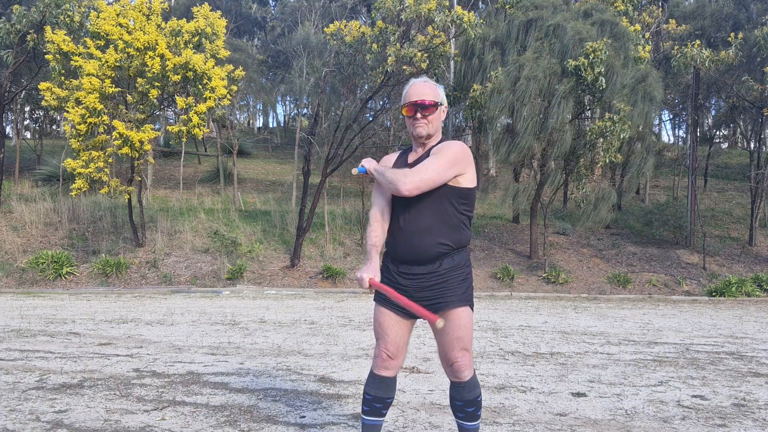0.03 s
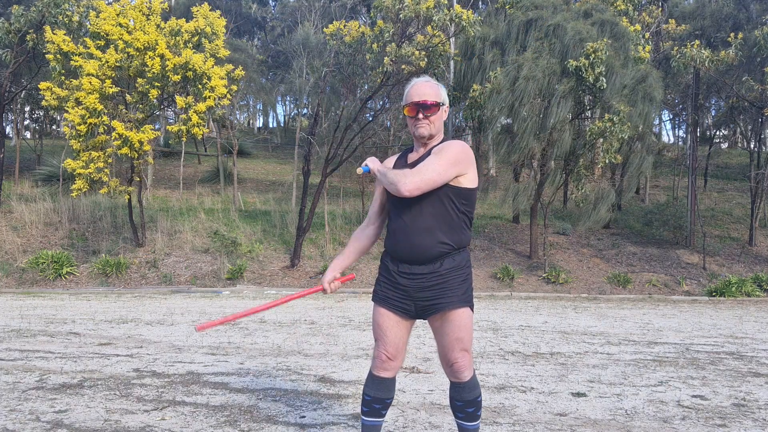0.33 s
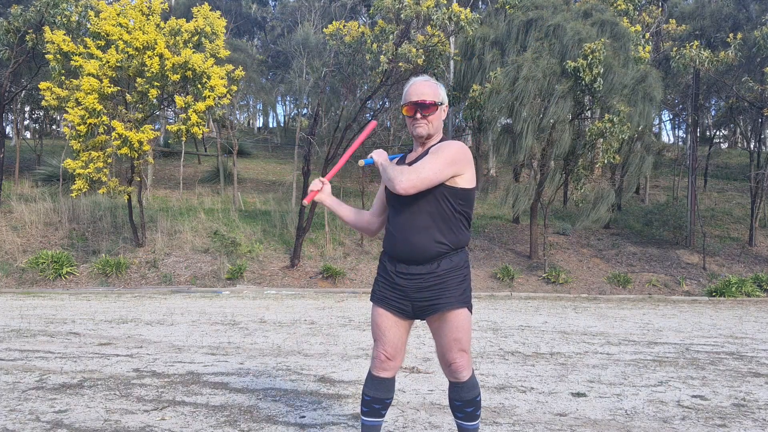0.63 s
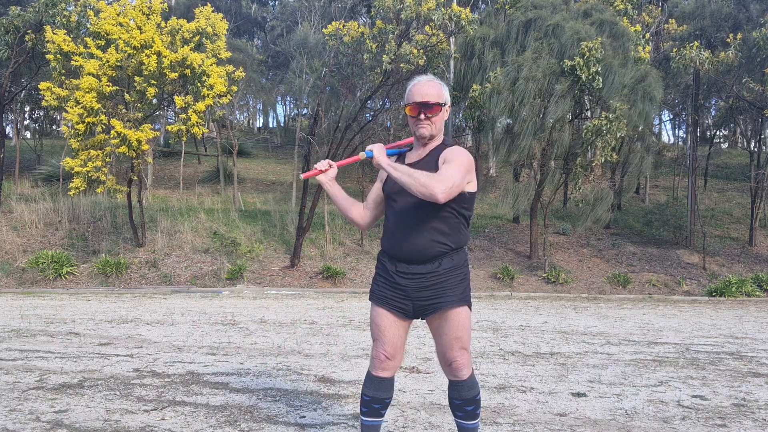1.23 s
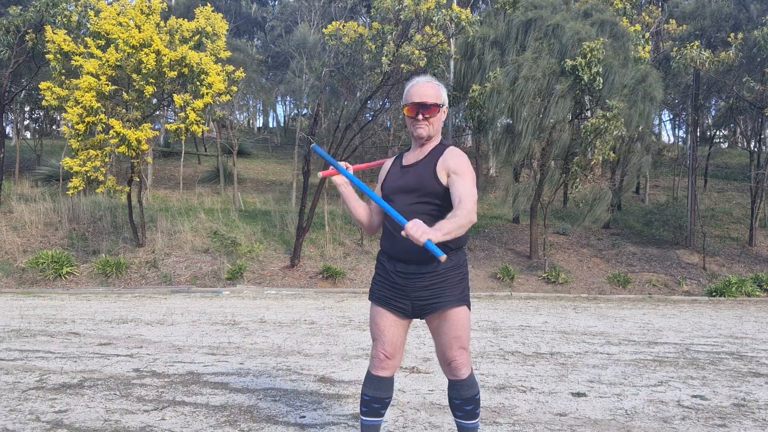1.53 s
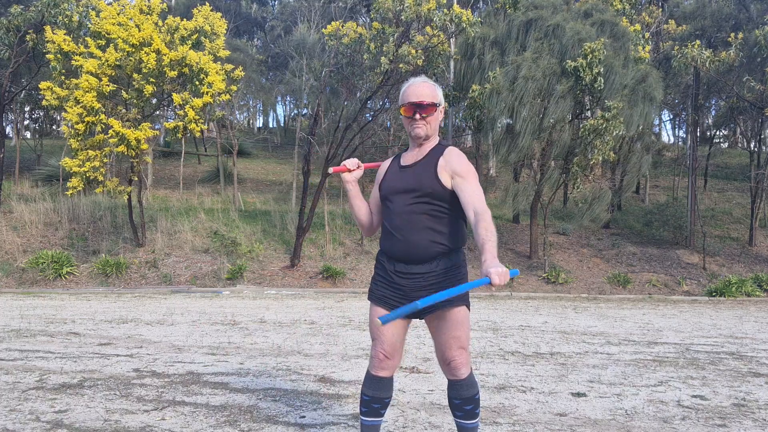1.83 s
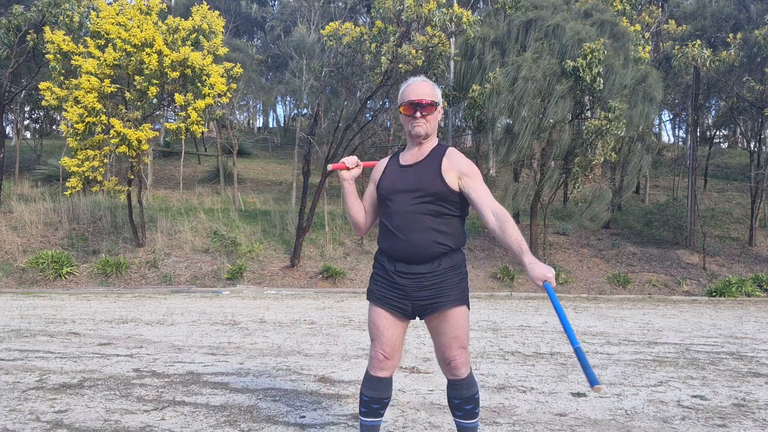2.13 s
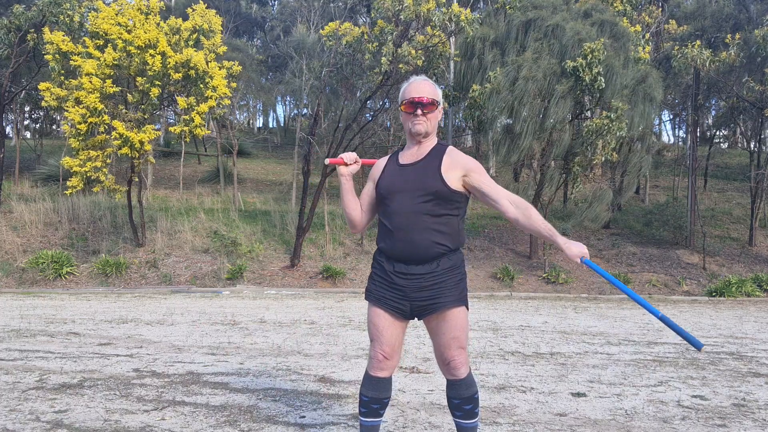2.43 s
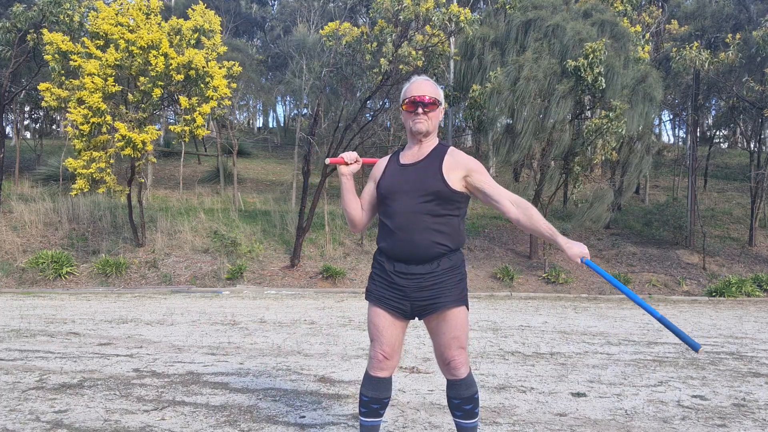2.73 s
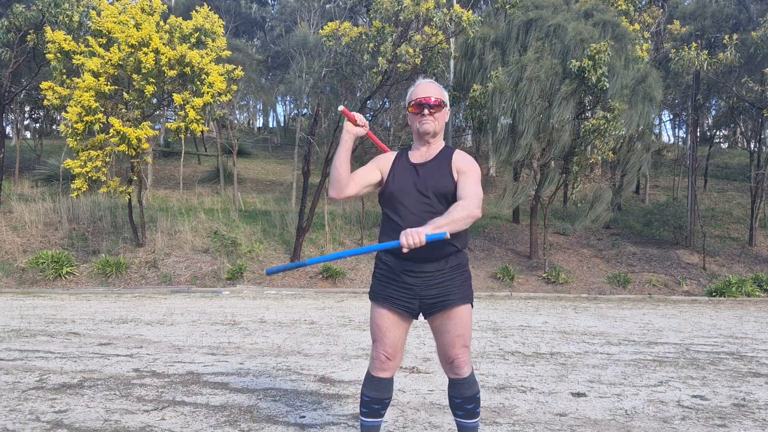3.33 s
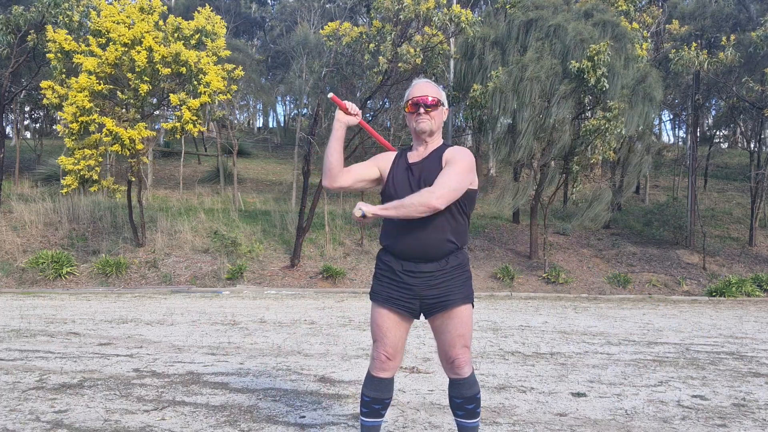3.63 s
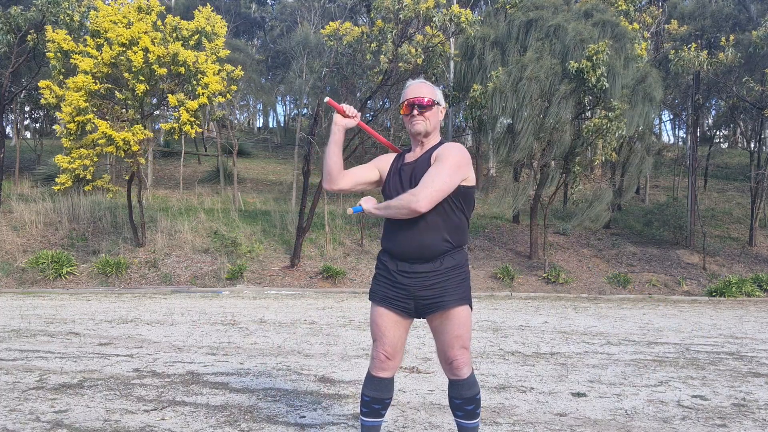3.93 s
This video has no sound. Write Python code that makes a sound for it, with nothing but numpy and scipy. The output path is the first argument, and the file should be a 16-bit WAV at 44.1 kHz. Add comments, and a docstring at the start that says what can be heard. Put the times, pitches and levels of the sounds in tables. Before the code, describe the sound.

One sharp stick smack on a body, then soft bird chirps and wind rumble.

```python
"""A stick lands on a body with one sharp smack and rebounds lightly, on a gravel yard beside a wood.
Each contact crackles and rings the stick's bending modes; ground and trees throw the crack back.
Small birds chirp and whistle in short glides, the loudest call turning hoarse.
Wind buffets the microphone with rumble and thumps; far traffic and leaves murmur behind it all."""
import sys
import numpy as np
from scipy import signal
from scipy.io import wavfile

SR = 44100
rng = np.random.default_rng(int(sys.argv[2]) if len(sys.argv) > 2 else 0)


def digitize_waveform(pressure):
    """Quantize a signal to 16-bit integers and store it at the path in sys.argv[1].

    Rows of a 2-D input are taken as channels; values are limited to [-1, 1].
    """
    field = np.atleast_2d(pressure).T
    bounded = np.clip(field, -1, 1)
    quanta = np.round(bounded * 32767).astype(np.int16)
    wavfile.write(sys.argv[1], SR, quanta)


N = 176400
TIME = np.arange(N) / SR

# landing and rebounds: t/s, relative level/dB, cut-off/Hz
CONTACTS = [(0.7591, -11.5, 5700), (0.8059, -25.5, 1450), (0.8258, -33, 1400), (1.1234, -36, 1200)]
# bending modes: f/Hz, relative level/dB, t60/s
STICK_MODES = [(847, -23.5, 0.051), (1285, -15, 0.029), (1377, -24.5, 0.0436), (1878, -17, 0.036),
               (1948, -7, 0.013), (2536, -14, 0.058), (3070, -10.5, 0.025), (3483, -15, 0.05),
               (4110, -3, 0.0096), (4990, -7.5, 0.005), (5650, -13.5, 0.014), (6180, -11, 0.005),
               (7430, -8.5, 0.0019), (8380, -14, 0.0091)]
# stereo spread of the modes: f/Hz, pan/dB
MODE_PAN = [(1300, -5), (1900, -3.5), (3000, 2), (4100, 4.5), (6000, 5), (8000, 5)]
def stick():
    """Each contact crackles and rings the bending modes, high ones first; softer contacts are duller."""
    travel_s, travel_ref_hz = 0.00127, 3770  # bending wave to the tip; lower ones are slower
    crackle_db, crackle_low_hz, crackle_t60_s = -15, 11000, .014
    force = np.zeros(N)
    for start_s, db, cutoff_hz in CONTACTS:
        click = from_db(db) * signal.unit_impulse(N, int(start_s * SR))
        force += filtered(click, cutoff_hz, "low")
    t = TIME[:SR // 20]
    crackle = filtered(rng.standard_normal(len(t)) * (t > travel_s), crackle_low_hz, "high")
    crackle *= decay(t, crackle_t60_s)
    smack = from_db(crackle_db) * signal.fftconvolve(force, crackle)[:N]
    for hz, db, t60_s in STICK_MODES:
        mode = delayed(ring(force, hz, t60_s), travel_s * np.sqrt(travel_ref_hz / hz))
        smack = smack + from_db(db) * panned(at_hz(MODE_PAN, hz)) * mode
    smack = filtered(smack, 1150, "high", order=4)
    return filtered(smack, 7000, "low", order=1)


# near reflections, ground first: delay/s, level/dB, cut-off/Hz, pan/dB
NEAR_ECHOES = [(.002164, -5.5, 8230, 5.5), (.009594, -21, 8000, -21), (0.0118, -18.5, 7940, 12)]
def yard(direct):
    """The direct crack, its near reflections and the wash scattered by gravel and trees."""
    out, mono = direct, direct.mean(0)
    for delay_s, db, top_hz, pan_db in NEAR_ECHOES:
        echo = filtered(delayed(mono, delay_s), top_hz, "low", order=1)
        out = out + from_db(db) * panned(pan_db) * echo
    gravel = from_db(-18.5) * scattered(mono, t60_s=0.1, onset_s=0.0025, top_hz=4930)
    trees = from_db(-32.5) * scattered(mono, t60_s=0.48, onset_s=0.026, top_hz=3980)
    return out + gravel + trees


# first bird: t/s, length/s, first f/Hz, middle f/Hz, last f/Hz, level/dB, overtone/dB, pan/dB
BIRD_CHIRPS = [(0.107, .065, 2850, 2950, 2900, -67.5, -30, 0), (.695, .048, 2600, 2670, 2330, -60, 0, -2),
               (.730, .058, 3000, 3330, 3050, -51, -30, 0), (0.795, 0.022, 2555, 2600, 2270, -65, 5.5, 11),
               (0.835, 0.016, 2630, 2390, 2330, -55.5, -16, -9), (2.03, 0.035, 2380, 2460, 2580, -68, 1, 5),
               (2.039, 0.029, 4100, 3370, 3130, -53, -27, -14),
               (2.172, .020, 3330, 3350, 3520, -56, -15, 7),
               (2.192, 0.016, 3330, 3270, 3430, -50.5, -15, -2),
               (2.209, 0.021, 3730, 3600, 3280, -42, -9, 12),
               (2.245, 0.0204, 3400, 3266, 3040, -40, -11.5, 2),
               (2.846, 0.045, 4100, 3430, 3450, -57, -31, -11.5)]
# second bird, thin and rising: t/s, length/s, first f/Hz, middle f/Hz, last f/Hz, level/dB
BIRD_WHISTLES = [(1.661, 0.086, 5700, 6750, 7300, -70), (1.965, .06, 6400, 6650, 7100, -82),
                 (2.024, .027, 7030, 7350, 7550, -66), (3.881, .062, 6440, 6600, 7120, -65.5)]
def birds():
    """Chirps, whistles and a rasp, blurred by nearby foliage and the wood behind."""
    chirps = sum(from_db(db) * panned(pan_db) * note(start_s, length_s, hz, overtone_db, partials=4)
                 for start_s, length_s, *hz, db, overtone_db, pan_db in BIRD_CHIRPS)
    whistles = sum(from_db(db) * note(start_s, length_s, hz)
                   for start_s, length_s, *hz, db in BIRD_WHISTLES)
    song = chirps + whistles + rasp()
    foliage = from_db(-18) * scattered(song.mean(0), t60_s=0.13, onset_s=0.0033, top_hz=9300)
    wood = from_db(-21) * scattered(song.mean(0), t60_s=1, onset_s=0.018, top_hz=6000)
    return song + foliage + wood


def note(start_s, length_s, pitches_hz, overtone_db=0, partials=1):
    """One wavering glide through three pitches, each overtone weaker than the last."""
    edge_share, wobble, flutter_db, step_db = .3, .005, 1.5, 20
    progress = (TIME - start_s) / length_s
    on = (progress > 0) & (progress < 1)
    glide_hz = np.polyval(np.polyfit([0, .5, 1], pitches_hz, 2), progress[on])
    hz = glide_hz * (1 + wobble * drift(120)[on])
    phase = 2 * np.pi * np.cumsum(hz) / SR
    overtones = sum(from_db(overtone_db - step_db * (k - 1)) * np.sin((k + 1) * phase)
                    for k in range(1, partials))
    ramp = np.clip(np.minimum(progress[on], 1 - progress[on]) / edge_share, 0, 1)
    envelope = np.sin(np.pi / 2 * ramp) ** 2 * from_db(flutter_db * drift(60)[on])
    out = np.zeros(N)
    out[on] = envelope * (np.sin(phase) + overtones)
    return out


# hoarseness of the loudest call: t/s, level/dB
RASP_ENVELOPE = [(2.19, -76), (2.215, -58), (2.228, -60), (2.236, -54), (2.25, -62.5), (2.285, -67),
                 (2.31, -73), (2.36, -100)]
def rasp():
    """Hoarse noise around the call's pitch and two overtones."""
    centre_hz, width_hz, step_db = 3540, 1450, 13
    level_db, = in_time(RASP_ENVELOPE)
    hiss = np.zeros(N)
    for k in (1, 2, 3):
        band_hz = k * centre_hz + np.array([-.5, .5]) * width_hz * np.sqrt(k)
        hiss += from_db(-step_db * (k - 1)) * rms_one(filtered(rng.standard_normal(N), band_hz, "band"))
    return from_db(level_db) * hiss


# gusts: t/s, relative level/dB, pan/dB
GUSTS = [(0.0, -61.5, -2), (0.11, -50.5, 0.5), (0.31, -56, -3), (0.34, -52.5, 9), (0.72, -43.5, 17.5),
         (0.77, -49, 1), (0.87, -40, 5.5), (1.32, -47, 4.5), (1.47, -44, -3.0), (1.56, -46, 8),
         (2.51, -47.5, 2.5), (2.56, -38.5, -2.5), (2.86, -44.5, 7), (2.91, -57, 1), (3.05, -39.5, 13.5),
         (3.22, -47, 2), (3.41, -33.5, 8.5), (3.44, -34, -7.5), (3.5, -39.5, 15.5), (3.56, -34, -9.5),
         (3.7, -43.5, 17), (3.75, -32, 4.5), (3.82, -43, 19), (4.0, -42, -4)]
# rumble spectrum: f/Hz, relative density/dB
WIND_SPECTRUM = [(20, -9), (35, 0), (55, 2.5), (90, -4.5), (130, -16), (200, -24.5), (350, -44), (700, -59)]
def wind():
    """Lumpy rumble, different at each microphone port."""
    level_db, pan_db = in_time(GUSTS)
    rumble = banded_noise(WIND_SPECTRUM, low_hz=19.56, bands=11, flicker_db=0.87)
    return from_db(level_db + 4) * panned(pan_db) * rumble


# thumps on the ports: t/s, relative peak/dB, pan/dB
EDDY_THUMPS = [(0.703, -48, 10), (0.972, -40, 7.0), (2.555, -55, -18), (3.02, -59, 21), (3.087, -62, 13.0),
               (3.258, -48, 8.0), (3.303, -38.5, 19), (3.387, -37.5, 7.5), (3.449, -37.5, 15),
               (3.502, -35.5, 14), (3.537, -37, 8), (3.634, -38, 23), (3.67, -36.5, 20.0), (3.701, -36, 25),
               (3.745, -34, 8), (3.805, -33, 26)]
def eddies():
    """Each eddy is one dull flap of pressure, a push or a pull, that swings back."""
    gain_db, lag_s, band_hz, top_hz = 5.5, 0.00417, [69.4, 147], 257
    flap = filtered(signal.unit_impulse(SR // 8), band_hz, "band", order=1)
    flap = filtered(flap, top_hz, "low", order=3)
    flap /= np.abs(flap).max()
    out = np.zeros((2, N + SR))
    for (start_s, db, pan_db), sign in zip(EDDY_THUMPS, rng.choice([-1, 1], len(EDDY_THUMPS))):
        sides, start = panned(pan_db), int((start_s + lag_s) * SR)
        out[:, start:start + len(flap)] += sign * from_db(db + gain_db) * sides / sides.mean() * flap
    return out[:, :N]


# murmur spectrum: f/Hz, relative density/dB
MURMUR_SPECTRUM = [(120, -33), (200, -5), (371, -5), (407, -4), (534, -4), (827, -5), (939, -12.5),
                   (1150, -10.5), (2600, -20), (2950, -18), (3350, -24.5), (8960, -33.5), (15500, -45)]
# murmur stereo likeness: f/Hz, left-right correlation
MURMUR_CORRELATION = [(100, 0.58), (300, 1), (600, 0.1), (1200, 0.067), (3000, 0.033), (10000, 0.017)]
# slow swell: t/s, relative level/dB
MURMUR_SWELL = [(0, 1.3), (1, 0.5), (2.2, 1.46), (3, 0.6), (4, 1.15)]
def far_murmur():
    """Distant traffic and leaves, nearly steady."""
    swell_db, = in_time(MURMUR_SWELL)
    murmur = banded_noise(MURMUR_SPECTRUM, low_hz=185.3, bands=13, flicker_db=1.2,
                          correlation=MURMUR_CORRELATION)
    return from_db(swell_db - 58.5) * murmur


def banded_noise(spectrum, low_hz, bands, flicker_db, correlation=None):
    """Flickering half-octave bands of stereo noise, unit rms in total."""
    out, edges_hz = 0, low_hz * 2 ** (np.arange(bands + 1) / 2)
    white = rng.standard_normal((2, 2, N + SR // 2))
    for k, (low, high) in enumerate(zip(edges_hz, edges_hz[1:])):
        mid, side = filtered(white[k % 2], [low, high], "band", order=3)[:, -N:]
        hz = np.sqrt(low * high)
        alike = at_hz(correlation, hz) if correlation else 0
        gain = from_db(at_hz(spectrum, hz) + flicker_db * drift(15.4))
        out = out + gain * (np.sqrt(1 + alike) * mid + np.sqrt(1 - alike) * side * [[1], [-1]])
    return rms_one(out)


def scattered(x, t60_s, onset_s, top_hz):
    """Dense dull echoes that build up and die away, different on each side."""
    t = TIME[:SR]
    build_up = 1 - np.exp(-(t / onset_s) ** 2)
    echoes = filtered(rng.standard_normal((2, SR)), top_hz, "low") * decay(t, t60_s) * build_up
    return signal.fftconvolve(np.atleast_2d(x), rms_one(echoes) / np.sqrt(SR), axes=1)[:, :N]


def ring(x, hz, t60_s):
    """Resonator: a unit click starts a decaying unit sine."""
    r, w = decay(1 / SR, t60_s), 2 * np.pi * hz / SR
    return signal.lfilter([0, np.sin(w)], [1, -2 * r * np.cos(w), r * r], x + 1e-18)


def drift(rate_hz):
    """Smooth random wander, unit rms."""
    hop, settle = 40, 2000
    r = np.exp(-2 * np.pi * rate_hz * hop / SR)
    slow = signal.lfilter([1], [1, -2 * r, r * r], rng.standard_normal(N // hop + settle + 2))[settle:]
    return np.interp(np.arange(N) / hop, np.arange(len(slow)), rms_one(slow))


def filtered(x, hz, kind, order=2):
    """Butterworth filter."""
    return signal.sosfilt(signal.butter(order, np.clip(hz, 10, .45 * SR), kind, fs=SR, output="sos"),
                          x + 1e-18)


def decay(t, t60_s):
    return np.exp(-np.log(1000) * t / t60_s)


def delayed(x, delay_s):
    return np.interp(TIME - delay_s, TIME, x)


def from_db(db):
    return 10 ** (np.asarray(db) / 20)


def rms_one(x):
    return x / np.sqrt(np.mean(x ** 2) + 1e-20)


def in_time(rows):
    """Each column of a curve at every sample."""
    times_s, *columns = np.transpose(rows)
    return [np.interp(TIME, times_s, column) for column in columns]


def at_hz(points, hz):
    """Interpolate on a log-frequency axis."""
    points_hz, values = np.transpose(points)
    return np.interp(np.log(hz), np.log(points_hz), values)


def panned(pan_db):
    """Stereo gains for a left-minus-right level."""
    return from_db(np.array([[.5], [-.5]]) * pan_db)


def scene():
    """The smack in the yard over birds, wind and far murmur."""
    return yard(stick()) + birds() + wind() + eddies() + far_murmur()


def record(dry):
    """The microphone's narrow dip, then a steep treble cut."""
    dip_hz, dip_q, dip_depth, cutoff_hz = 998, 6.1, 0.46, 15700
    coloured = dry - dip_depth * signal.lfilter(*signal.iirpeak(dip_hz, dip_q, fs=SR), dry)
    return signal.sosfilt(signal.ellip(10, .1, 80, cutoff_hz, fs=SR, output="sos"), coloured)


dry = scene()
out = record(dry)
digitize_waveform(out)
```